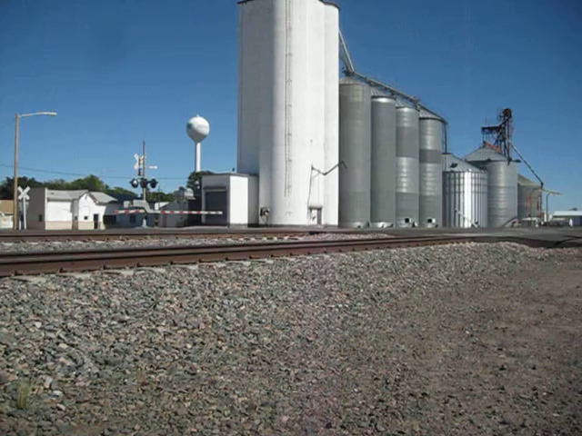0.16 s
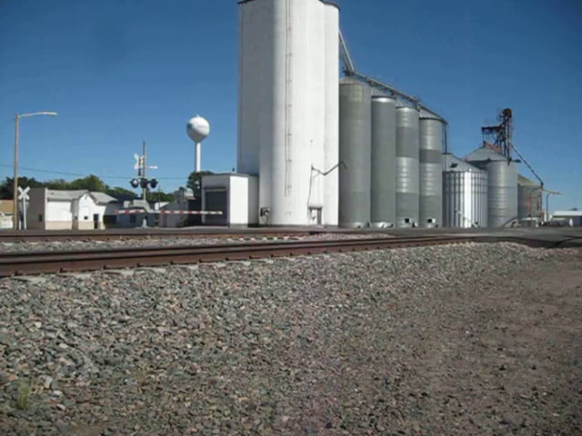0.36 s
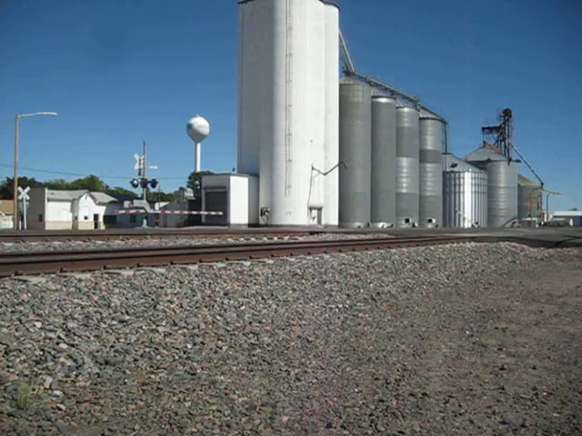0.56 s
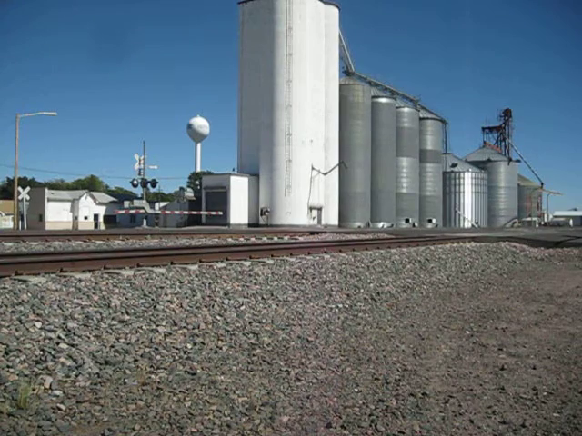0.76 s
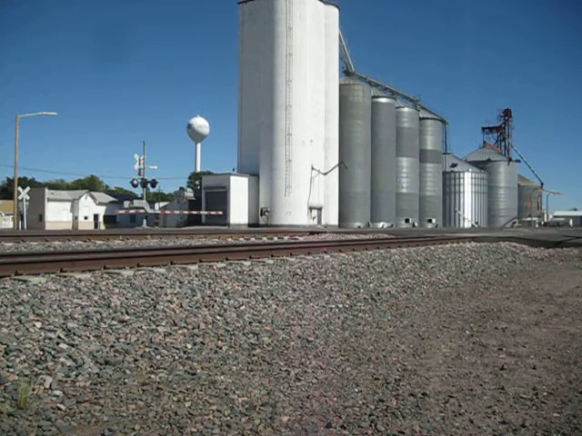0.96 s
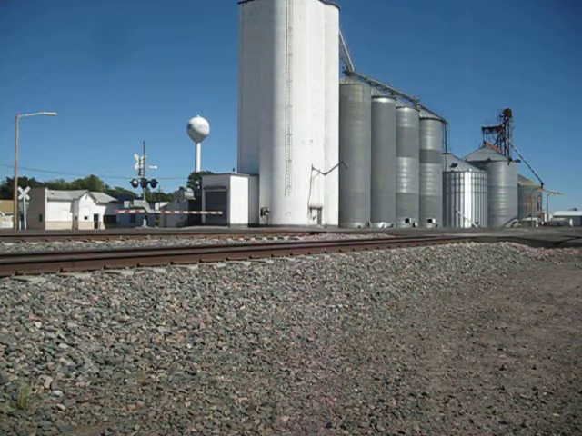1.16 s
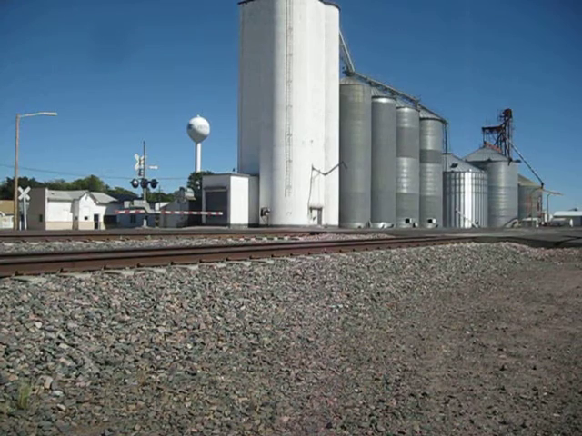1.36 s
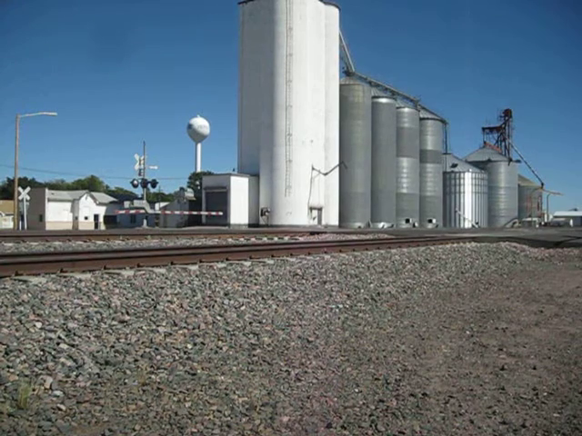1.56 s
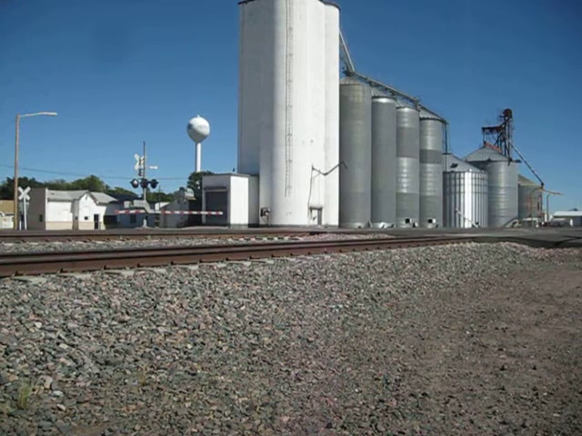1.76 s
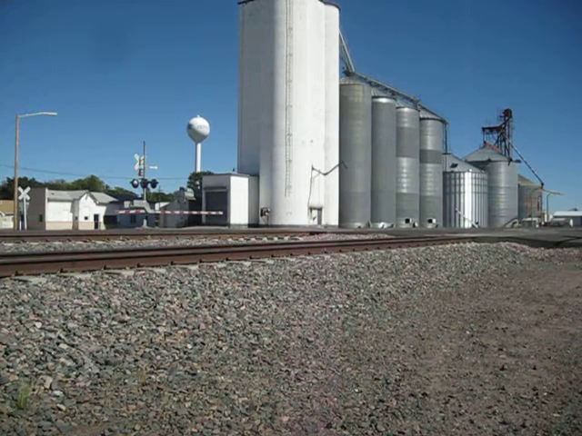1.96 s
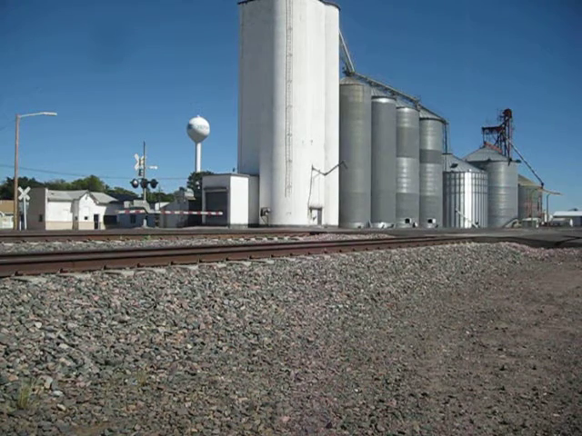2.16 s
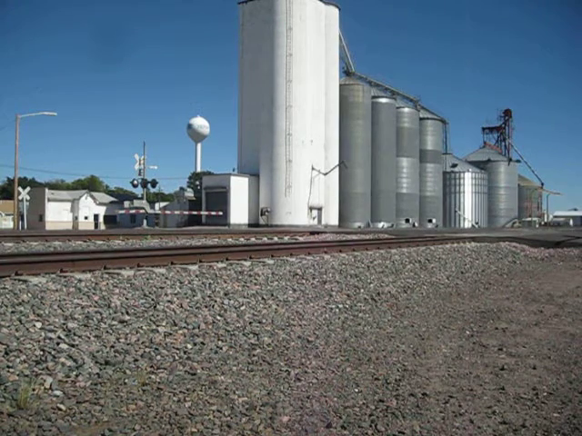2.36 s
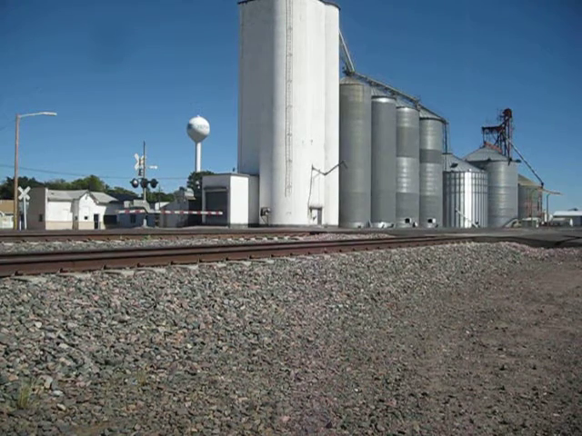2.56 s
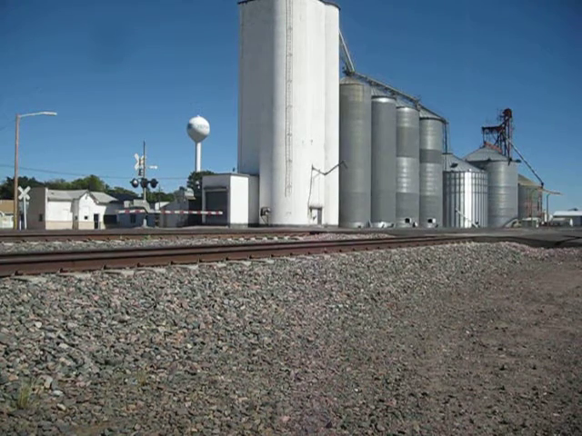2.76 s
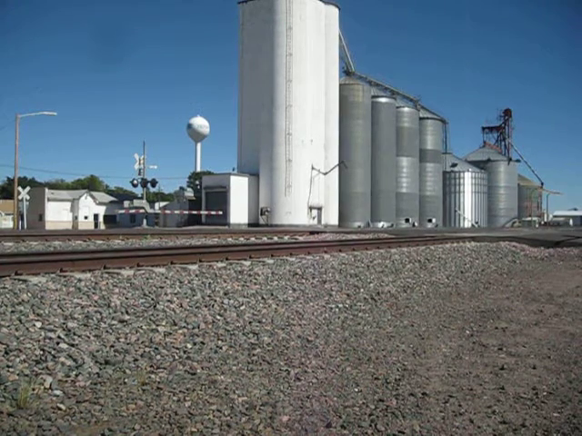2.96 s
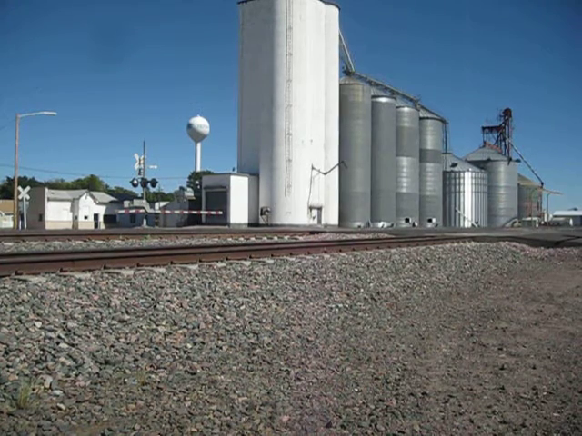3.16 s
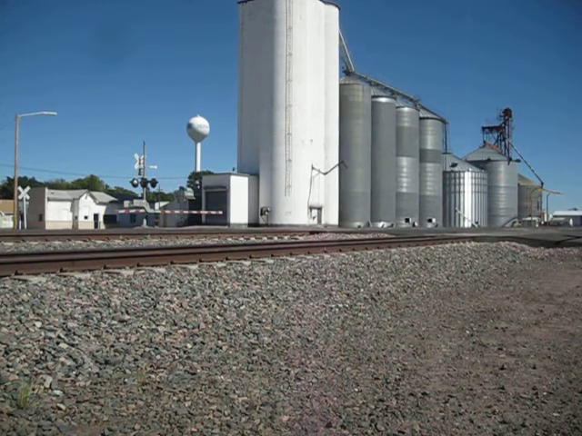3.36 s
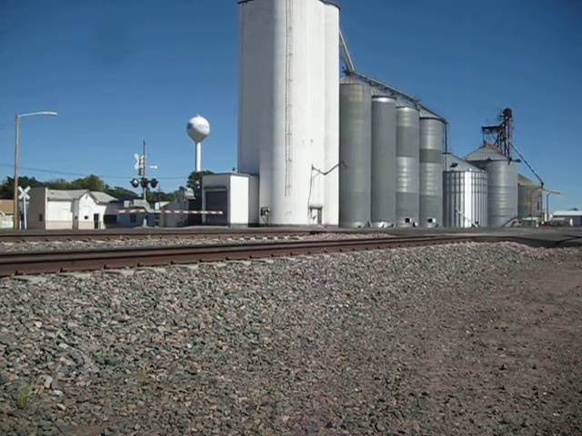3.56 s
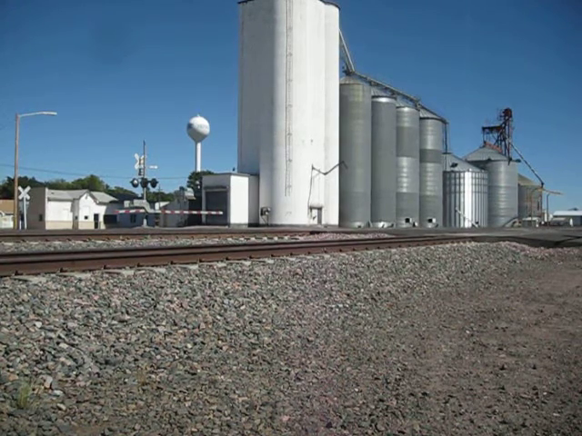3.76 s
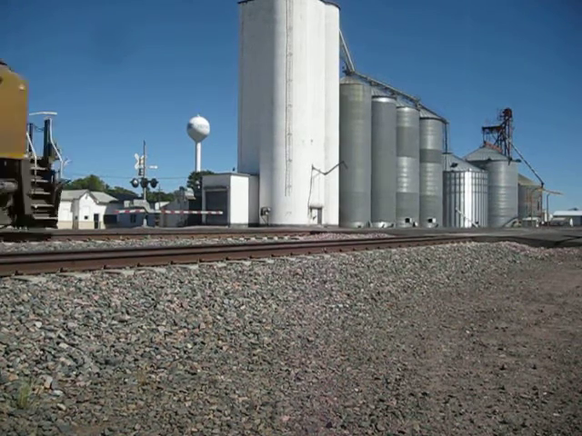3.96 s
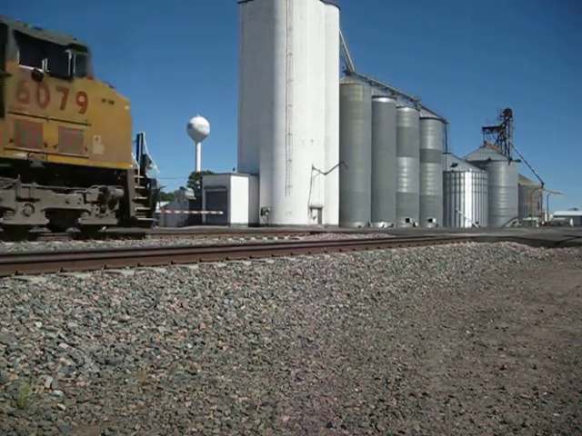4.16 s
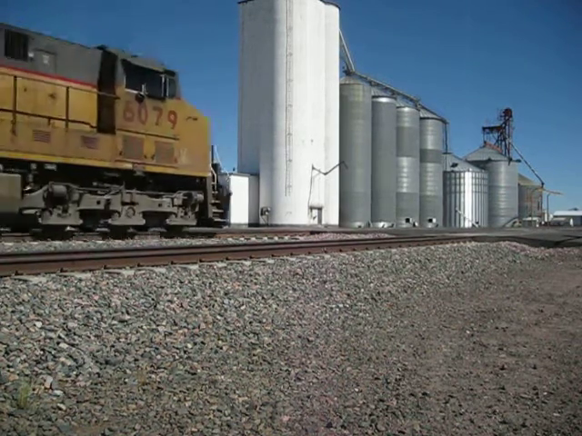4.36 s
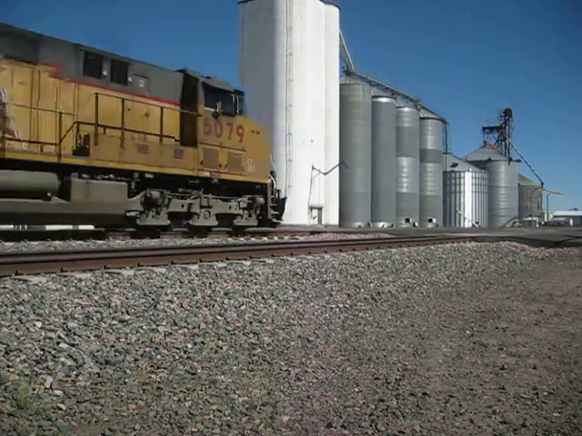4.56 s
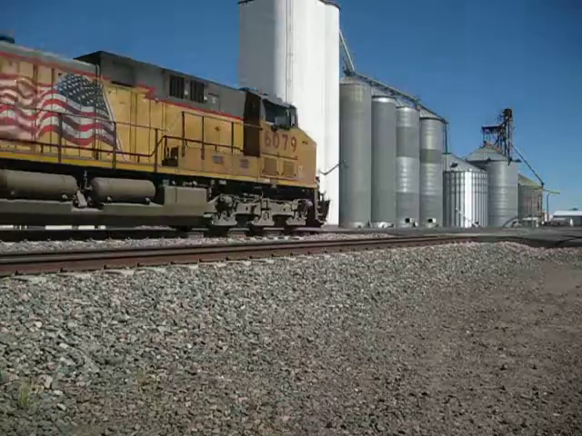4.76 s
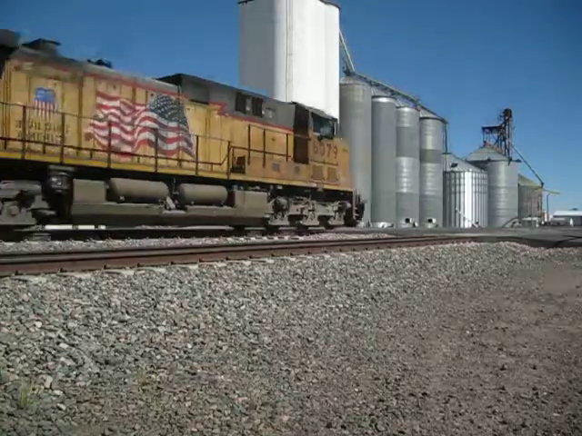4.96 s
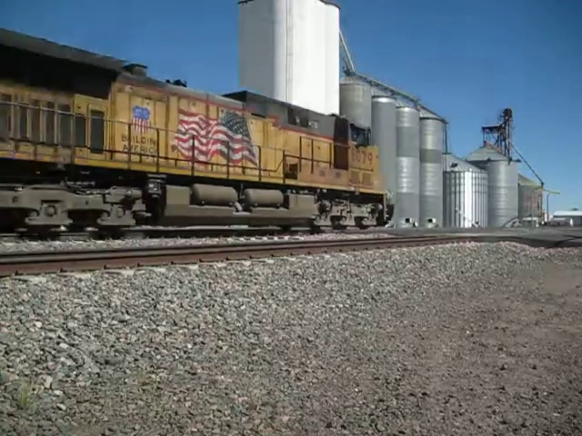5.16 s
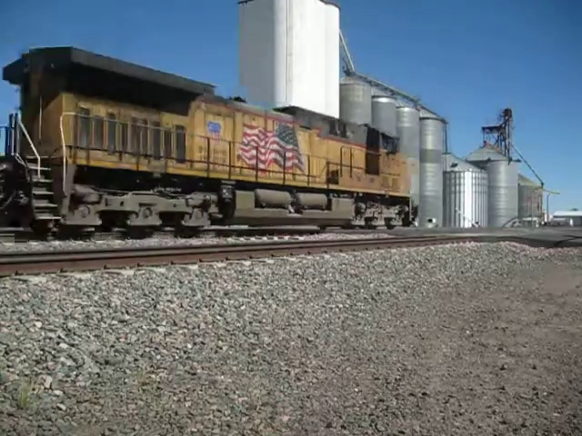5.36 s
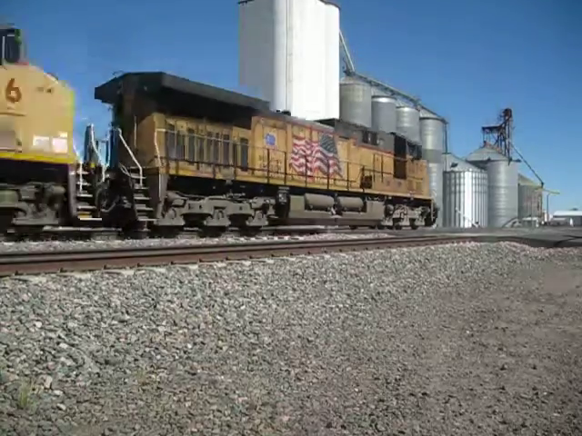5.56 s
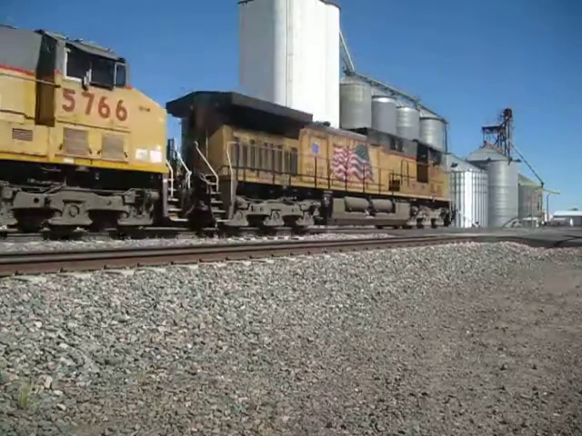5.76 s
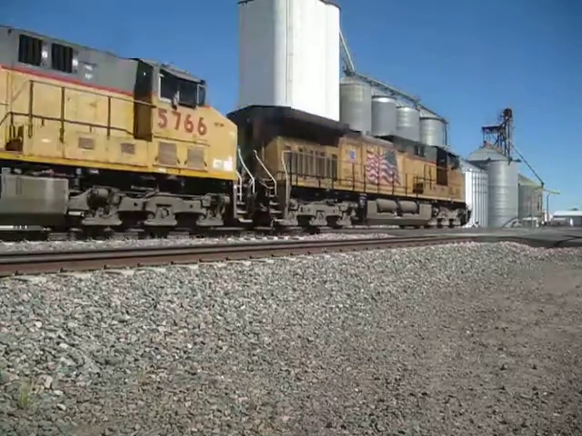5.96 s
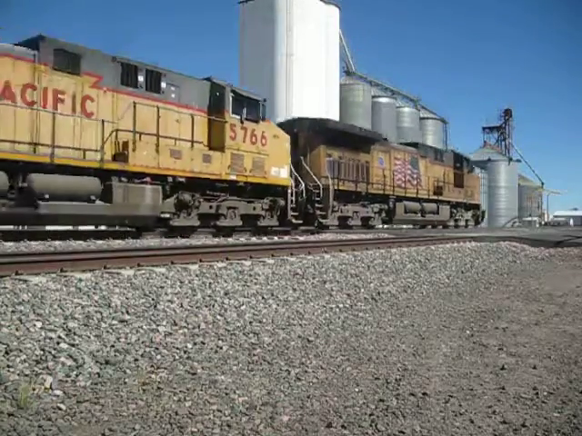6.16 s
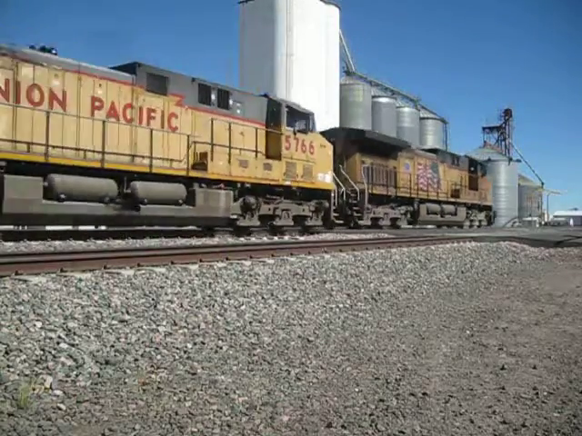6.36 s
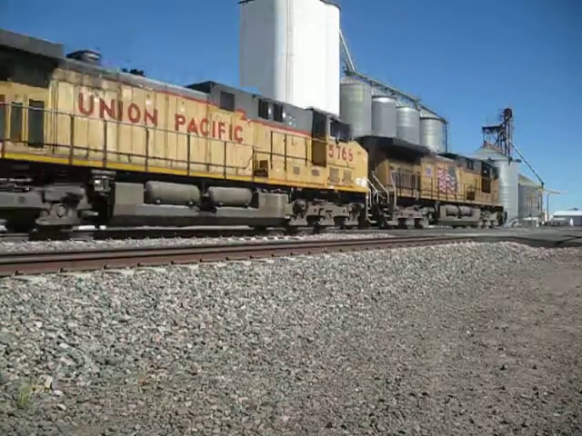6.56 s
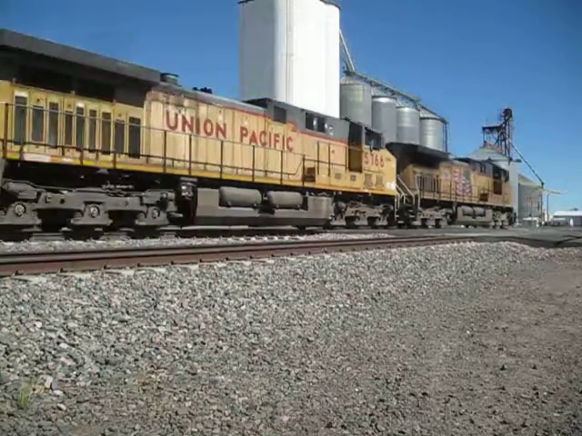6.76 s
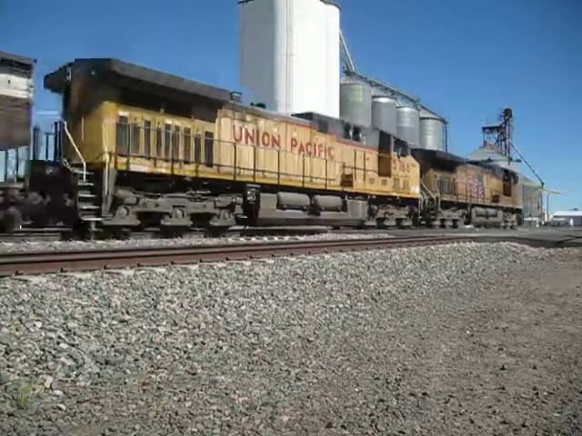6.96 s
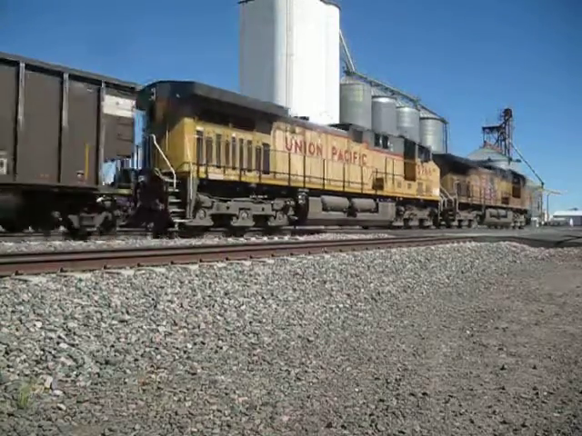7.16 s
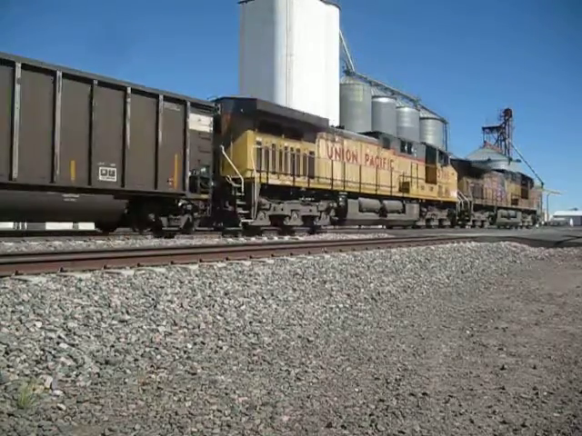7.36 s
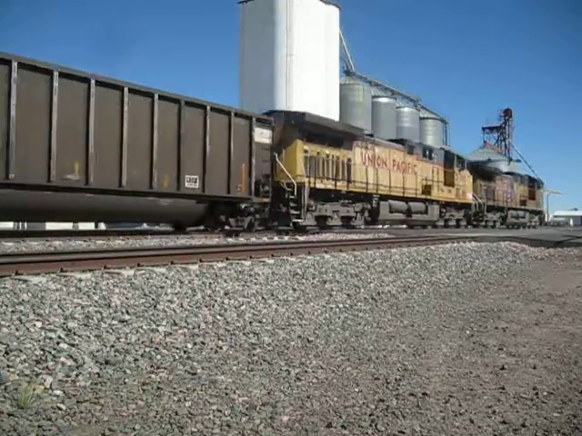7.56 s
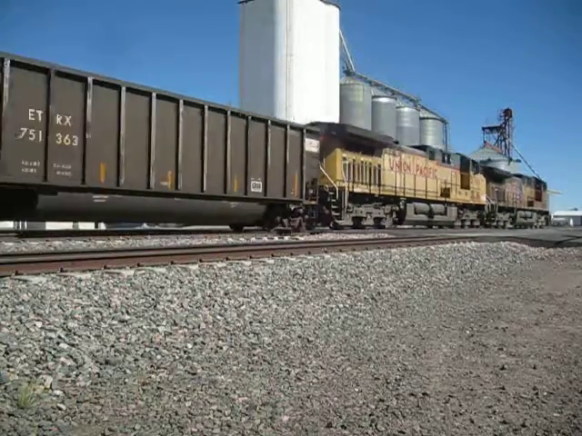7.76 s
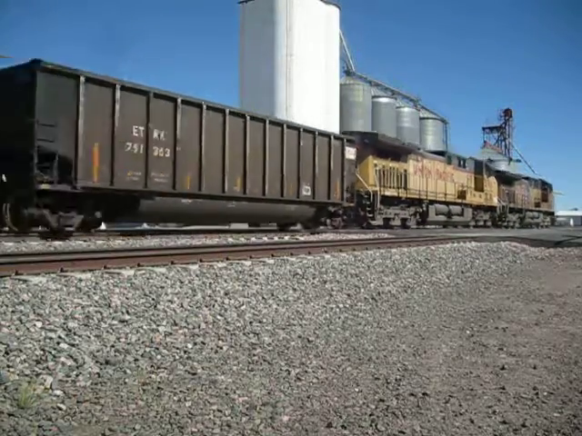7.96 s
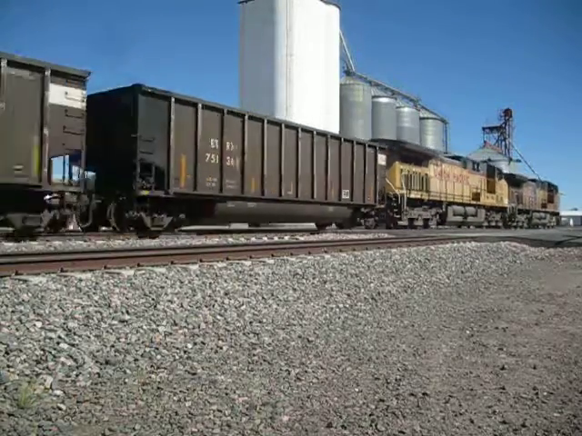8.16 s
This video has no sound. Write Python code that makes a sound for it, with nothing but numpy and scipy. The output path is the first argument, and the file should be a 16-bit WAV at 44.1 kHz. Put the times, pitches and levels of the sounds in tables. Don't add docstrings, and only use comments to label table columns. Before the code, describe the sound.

A freight locomotive blares a short then a long brassy chord on its air horn as it rumbles past a clanging level crossing.

```python
import sys
import numpy as np
from scipy import signal
from scipy.fft import rfft, irfft, next_fast_len
from scipy.io import wavfile
from scipy.ndimage import uniform_filter1d, map_coordinates

SR = 44100
rng = np.random.default_rng(int(sys.argv[2]) if len(sys.argv) > 2 else 0)


def transcribe(signal):
    frames = np.atleast_2d(signal).T
    limited = np.clip(frames, -1, 1)
    pcm = np.round(limited * 32767).astype(np.int16)
    wavfile.write(sys.argv[1], SR, pcm)


def boost_factor(decibels):
    exponent = np.asarray(decibels, float) / 20
    return 10 ** exponent


N = 362405


def unit(x):
    return x / np.sqrt(np.mean(x ** 2) + 1e-20)


def clock():
    return np.arange(N) / SR


def along(points, hz):
    f, v = np.transpose(points)
    return np.interp(np.log(hz + 1), np.log(f + 1), v, -90, -90)


def curves(rows):
    s, *cols = np.transpose(rows)
    return [np.interp(clock(), s, c) for c in cols]


def wobble(rate):
    knots = rng.standard_normal(400)
    coarse = np.arange(0, N, 64)
    return np.interp(clock(), coarse / SR, map_coordinates(knots, [coarse * rate / SR]))


def filtered(x, response):
    m = next_fast_len(N + 8192)
    return irfft(rfft(x, m) * response(np.fft.rfftfreq(m, 1 / SR)), m)[:N]


def rush(response, patchy_db):
    z = signal.stft(rng.standard_normal(N + 512), nperseg=512)[2]
    field = uniform_filter1d(rng.standard_normal(z.shape), size=6, axis=0)
    field = uniform_filter1d(field, size=12, axis=1)
    noise = signal.istft(z * boost_factor(patchy_db * unit(field)), nperseg=512)[1][:N]
    return unit(filtered(noise, response))


def gate(start, stop, rise, fall):
    opening = np.clip((clock() - start) / rise, 0, 1)
    closing = np.clip((stop - clock()) / fall + 1, 0, 1)
    return opening * closing


# [from/s, to/s, level/dB, return/s]
TURN_DOWN = [
    (0.535, 2.068, -17.5, 0.23),
    (3.83, 7.053, -15.5, 0.39),
]


def ducked():
    return sum(db * gate(a, b, 0.037, back) for a, b, db, back in TURN_DOWN)


# [f/Hz, level/dB per Hz]
RUMBLE = [(8.8, -39), (15, -17), (22, -17.5), (53, -4.5), (65, 1), (107, -3.5), (144, -1.5), (298, -16.5),
          (330, -9), (430, -32.5), (730, -120)]
# [f/Hz, level/dB per Hz]
ROAR = [(120, -23.5), (200, -12.5), (355, -2), (401, -6), (747, -1), (983, -9.5), (1120, -2.5),
        (1210, -7.5), (1730, -8.5), (3500, -22), (4550, -54), (7700, -120)]
# [f/Hz, level/dB per Hz]
HISS = [(1060, -15), (1800, -3), (2360, 2), (3190, 0.5), (4070, -1), (5700, -7.5), (6150, -14),
        (6600, -35.5), (8580, -57.5), (14500, -120)]
# [f/Hz, width/Hz, level/dB]
GEARS = [(68.6, 28, -7), (399, 22, 0.5), (797, 48, -1), (666, 58, -9), (953, 65, -7), (1242, 36, -8)]
# [t/s, level/dB]
WHINE_LEVEL = [(0, -34.5), (.3, -36), (2.3, -40), (2.55, -27), (3.75, -26), (4, -55)]
# [t/s, rumble level/dB, wheels and fans in view level/dB]
TRAIN_LEVEL = [(0, -28.5, 0), (.5, -31.5, 4.5), (1.5, -39, 0.5), (2.15, -26, 3), (2.35, -30, 0.5),
               (2.6, -26.5, 4), (3.2, -28, 6), (3.75, -31, 9), (5.2, -31.5, 19.5), (6.65, -33.5, 16.5),
               (7.5, -32, 10.5), (7.95, -33.5, 14), (8.22, -24.5, 5)]
HISS_PATCHY_DB = 1.2


def train():
    rumble_db, view_db = curves(TRAIN_LEVEL)
    rumble = boost_factor(rumble_db + 1.4 * wobble(9.9)) * rush(lambda f: boost_factor(along(RUMBLE, f)), patchy_db=1.5)
    roar = boost_factor(rumble_db - 7 + view_db) * rush(lambda f: boost_factor(along(ROAR, f)), patchy_db=2.5)
    hiss_db = rumble_db - 23 + 1.68 * view_db - .45 * ducked()
    hiss = boost_factor(hiss_db) * rush(lambda f: boost_factor(along(HISS, f)), patchy_db=HISS_PATCHY_DB)

    def teeth(f):
        return sum(boost_factor(db) / np.sqrt(w) / (1 + (2 * (f - c) / w) ** 2) for c, w, db in GEARS)

    throb_db, throb_s, crest_s = 1, .32, 3.12
    throb = throb_db * np.cos(2 * np.pi * (clock() - crest_s) / throb_s)
    whine = boost_factor(curves(WHINE_LEVEL)[0] + throb) * rush(teeth, patchy_db=2.5)
    return rumble + roar + hiss + whine


def wagon():
    body = rush(lambda f: 1 / (1 + ((f - 320) / 110) ** 4), patchy_db=2)
    return boost_factor(-26.5 + 1.5 * wobble(6)) * gate(7.25, 9, 0.23, .1) * body


# [t/s, level/dB, f/Hz]
THUDS = [
    (3.829, -22, 90),
    (7.507, -13, 240),
    (7.825, -24, 200),
    (8.199, -24, 220),
]


def rail_joint():
    out = np.zeros(N)
    for s, db, hz in THUDS:
        t = np.maximum(clock() - s, 0)
        out += boost_factor(db - 60 * t / 0.023) * np.sin(2 * np.pi * hz * t)
    return out


# [t/s, level/dB, time to fade by 60 dB/s]
SPITS = [
    (0.421, -24, 0.079),
    (3.745, -29.5, 0.14),
    (7.79, -37, 0.42),
]
# [f/Hz, level/dB]
SPIT_COLOUR = [(1200, -14), (1700, -4), (2400, -8), (3200, -3), (4500, 0), (6000, -3), (6800, -20)]


def air_valves():
    air = rush(lambda f: boost_factor(along(SPIT_COLOUR, f)), patchy_db=2)
    out = np.zeros(N)
    for s, db, t60 in SPITS:
        t = np.maximum(clock() - s, 0)
        out += boost_factor(db - 60 * t / t60) * (1 - np.exp(-t / 0.00083)) * air
    return out


def ring(modes, s, factor=1):
    t = np.maximum(clock() - s, 0)[:4 * SR]
    tone = sum(boost_factor(db - 60 * t / t60) * np.sin(2 * np.pi * hz * factor * t) for hz, db, t60 in modes)
    return np.pad(tone * (1 - np.exp(-t / 0.0037)), (0, N - len(t)))


# [f/Hz, level/dB, time to fade by 60 dB/s]
ENGINE_BELL = [(2020, -9.5, 0.88), (2245, -6.5, 1.2), (2277, -8.5, 0.89), (3250, -20, .6), (3890, -17, 1.1),
               (5950, -23, .3)]
# [t/s, level/dB, pitch factor]
ENGINE_STROKES = [
    (.268, -29, 1),
    (1.25, -53.5, 1),
    (2.231, -46, 1),
    (3.21, -26.5, 1.008),
]


def engine_bell():
    return np.sqrt(2) * sum(boost_factor(db) * ring(ENGINE_BELL, s, f) for s, db, f in ENGINE_STROKES)


# [f/Hz, level/dB, time to fade by 60 dB/s]
GONG = [(1046, -3.5, 4.6), (1533, 0.5, 1.5), (2083, -5, 3.2), (2679, -1.5, 1.6)]
GONG_DB = [-32, -35, -25]
GONG_FADE = [-4, -.4, -3.5]
# [low tones level/dB, third level/dB, top level/dB]
GONG_STROKES = [(-2, -14, -6), (-2, -5, 1), (0, 0, -2), (0, -5, 0), (0, -5, 0), (0, -6, 0), (0, -8, -2),
                (0, -3, -3), (0, -4, 1), (1, -7, 4), (0, -7, 1)]


def crossing_gong(first_s=-.255, beat_s=.3853):
    parts = zip([GONG[:2], GONG[2:3], GONG[3:]], GONG_DB, GONG_FADE, np.transpose(GONG_STROKES))
    gong = np.zeros(N)
    for modes, db, fade, strokes_db in parts:
        strokes = sum(boost_factor(own) * ring(modes, first_s + k * beat_s) for k, own in enumerate(strokes_db))
        gong += boost_factor(db + fade * clock() + 1.2 * wobble(7)) * strokes
    return np.sqrt(2) * boost_factor(.95 * ducked()) * gong


REST_HZ = [319.3, 385.4, 495]
# [from/s, to/s]
BLASTS = [
    (0.502, 2.013),
    (3.821, 7.1),
]
# [f/Hz, level/dB]
ECHO_COLOUR = [(300, 2), (650, 4), (1000, -2.5), (1500, -3), (2500, -16), (4000, -26.5), (6000, -60)]
# [along the track from the listener/m, off the track/m, level/dB]
WALLS = [(-90.5, 15, -3.5), (-63.5, 27, -16), (-47, 22, -16.5), (-37, 45, -10.5), (-25.5, 30, 4),
         (-11, 50, -2), (6.5, 35, 1.5), (19.5, 28, -5.5), (37.5, 40, 4), (50, 22, -16.5), (73.5, 35, -5),
         (-30.5, 56, 3)]
# [t/s, level/dB]
ECHO_LEVEL = [(.5, -21), (.8, -34.5), (1.2, -29), (2.1, -27), (2.3, -22.5), (2.6, 1), (3.8, -16),
              (4.2, -29), (6, -29.5), (6.6, -31), (7.4, -30.5), (7.7, -44)]


def echoes(speed=13.2, pass_s=4.3):
    t = clock()
    comb = sum(signal.sawtooth(2 * np.pi * (hz * t + .15 * wobble(6))) for hz in REST_HZ)
    tone = unit(filtered(comb, lambda f: f * boost_factor(along(ECHO_COLOUR, f))))
    horn = tone * sum(gate(a, b, 0.016, 0.045) for a, b in BLASTS)
    place = speed * (t - pass_s)
    lead = np.hypot(speed * (BLASTS[0][0] - pass_s), 10) / 343
    out = np.zeros(N)
    for x, y, db in WALLS:
        path = np.hypot(place - x, y) + np.hypot(x, y)
        out += boost_factor(db + 5.7 * wobble(5)) * np.interp(t + lead - path / 343, t, horn)
    return boost_factor(curves(ECHO_LEVEL)[0] - 10.5) * out


# [t/s, low, middle and high trumpet level/dB, brightness/dB per octave]
HORN = [
    [(0.53, -24.5, -27, -33.5, -9.5), (0.62, -26, -38.5, -25.5, -3.1), (0.75, -31.5, -31, -27.5, -0.5),
     (0.95, -27.5, -30, -26.7, -0.5), (1.2, -33.5, -34.5, -26.2, 1), (1.45, -34.5, -35, -27, 1.5),
     (1.7, -32, -32, -26.5, -0.25), (1.95, -34.5, -35, -35, 2), (2.14, -33, -38.5, -37, -3.5)],
    [(3.84, -30, -30, -38, -4), (4.0, -26.5, -30, -18.5, -2.05), (4.4, -28.5, -27.6, -23.5, 1.67),
     (4.9, -27, -25, -24.5, 2.25), (5.4, -28.5, -23, -24.5, 2), (5.9, -26, -20.5, -22, 2.0),
     (6.5, -31.5, -32.5, -27.5, 3), (7.0, -38, -33.5, -35, 5.5), (7.4, -34.5, -34, -46, -4.8)],
]


def valve(lag):
    return sum(gate(b[0][0] - .003, b[-1][0] + lag, 0.0045, 0.1) for b in HORN)


def breath():
    low_db, mid_db, high_db, bright = curves(np.vstack(HORN))
    level_db = (low_db + mid_db + high_db) / 3
    roar = boost_factor(-18) * rush(lambda f: boost_factor(along(ROAR, f)), patchy_db=2.0)
    hiss = boost_factor(-15.5 + 2.5 * bright) * rush(lambda f: boost_factor(along(HISS, f)), patchy_db=HISS_PATCHY_DB)
    return boost_factor(level_db) * (roar + hiss) * valve(-.34)


def passing():
    still_hz, speed, pass_s, track_m = 316.3, 14.354, 4.3444, 13.33
    horn_m, ear_m = 4.663, 1.5
    t = clock()
    place = speed * (t - pass_s)
    far = np.hypot(place, track_m)
    first_s, second_s = HORN[0][0][0], HORN[1][0][0]
    since = t - np.where(t < second_s - .1, first_s, second_s)
    sharp = 1 + .0205 * np.exp(-np.abs(since) / .1636)
    hz = still_hz / (1 + speed / 343 * place / far) * sharp
    return hz, 2 * horn_m * ear_m / far / 343


CHORD = [1, 1.2067, 1.5525]
LAG_S = [0, 0.15, -0.055]
VOICE_DB = [
    [0, 2.3, -5, -9.5],
    [0, -3, -11.5, -14.5],
    [0, -14.5, -10, -16.5],
]
# [f/Hz, level/dB]
BRASS = [(1200, -14), (1600, -14.5), (2500, -17.5), (3500, -23), (4300, -29.5), (5400, -29), (7000, -54)]
EDGE_DB = [-4, -2.5, -2]
# [t/s, width/s, extra/dB per octave]
BEAMS = [
    (6.8, 0.21, 1.5),
    (5.31, 0.28, 1.5),
    (4.31, 0.26, 1.5),
]


def trumpet(size, count):
    hz, delay = passing()
    hz = CHORD[size] * hz
    *levels_db, bright = curves(np.vstack(HORN))
    facing_s, width_s, beam_db = BEAMS[size]
    bright = bright + beam_db * np.exp(-((clock() - facing_s) / width_s) ** 2)
    phase = 2 * np.pi * np.cumsum(hz * (1 + .0004 * wobble(25))) / SR
    slow = slice(0, N, 64)
    late = delay[slow]
    tone = np.zeros(N)
    for k in range(1, count):
        f = k * hz[slow]
        upper = k > len(VOICE_DB[size])
        if upper:
            voice_db = along(BRASS, f) + EDGE_DB[size] * np.clip(f / 4000, 0, 1)
        else:
            voice_db = VOICE_DB[size][k - 1]
        ground = .95 / (1 + f / (2200 * 343 * late))
        comb = np.abs(1 + ground * np.exp(-2j * np.pi * f * late))
        air_db = 1.2 * wobble(4) + (1.6 if upper else 1) * 1.4 * wobble(16)
        tilt_db = bright[slow] * np.log2(f / 500)
        gain = comb * boost_factor(levels_db[size][slow] + voice_db + tilt_db + air_db[slow])
        if upper:
            khz = k * hz.mean() / 1000 - 1
            speaks = sum(gate(b[0][0] + .027 * khz, b[-1][0] - .071 * khz, 0.036, .12) for b in HORN)
            gain *= speaks[slow]
        tone += np.interp(clock(), clock()[slow], gain) * np.sin(k * phase + k * k)
    return np.sqrt(2) * tone * valve(LAG_S[size])


def scene():
    horn = sum(trumpet(size, count) for size, count in enumerate([21, 18, 14]))
    bells = crossing_gong() + engine_bell()
    knocks = air_valves() + rail_joint()
    return (horn + breath() + echoes() + boost_factor(ducked()) * train() + wagon() + bells + knocks)[None]


# [t/s, level/dB, recovery/s]
DUCKS = [
    (-.01, -3.5, 0.22),
    (3.758, -5, 0.027),
    (7.511, -7, 0.08),
    (7.83, -4.5, 0.11),
]


def gain_control():
    t = clock()
    return boost_factor(sum(db * (t > s) / (1 + np.clip((t - s) / back, 0, 30) ** 4) for s, db, back in DUCKS))


def top_cut(x):
    return signal.sosfilt(signal.butter(12, 15800, fs=SR, output="sos"), x)


def record(dry):
    x = 1.362 * dry[0] * gain_control()
    x = x + .3 * x * x - .3 * uniform_filter1d(x * x, size=2000)
    x = x / (1 + np.abs(x / 0.29) ** 4) ** (1 / 4)
    x = filtered(x, lambda f: np.clip((6900 - f) / 300, 0, 1) ** 2 / (1 + (f / 6500) ** 30))
    at = round(4.74257 * SR)
    lost = 20 + np.argmax(np.abs(x[at + 20:at + 120] - x[at]))
    x = np.concatenate([x[:at], x[at + lost:], x[-lost:]])
    return top_cut(x[None])


dry = scene()
out = record(dry)
transcribe(out)
```